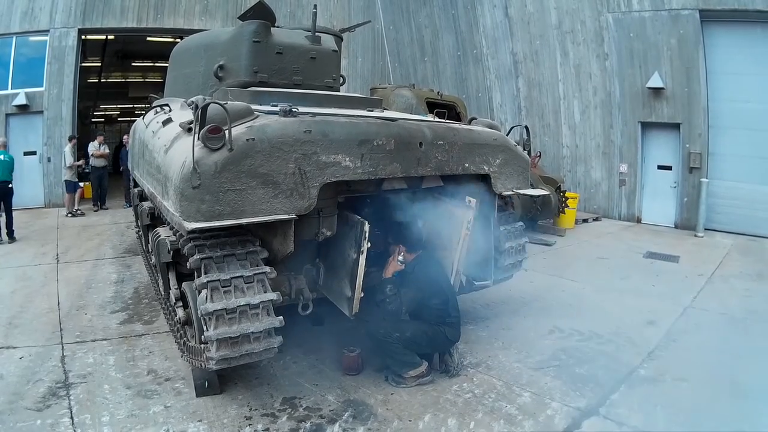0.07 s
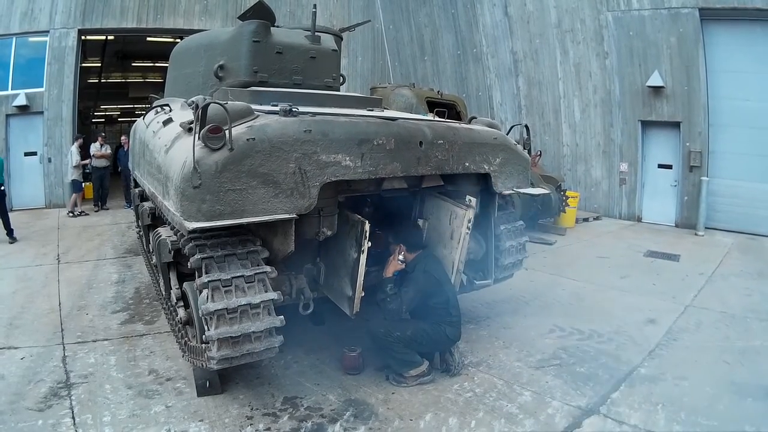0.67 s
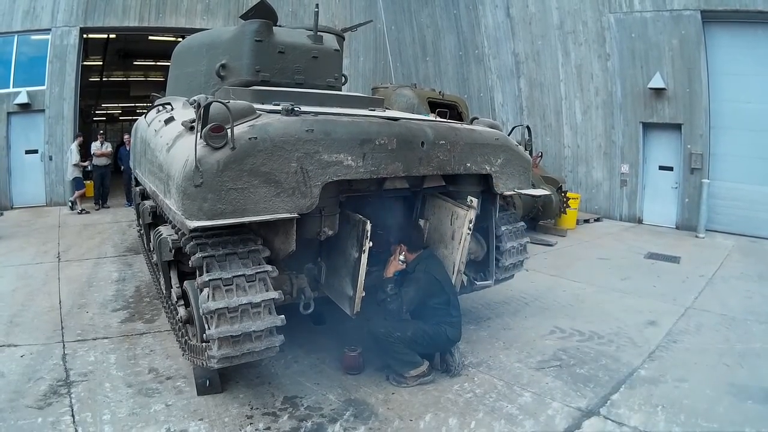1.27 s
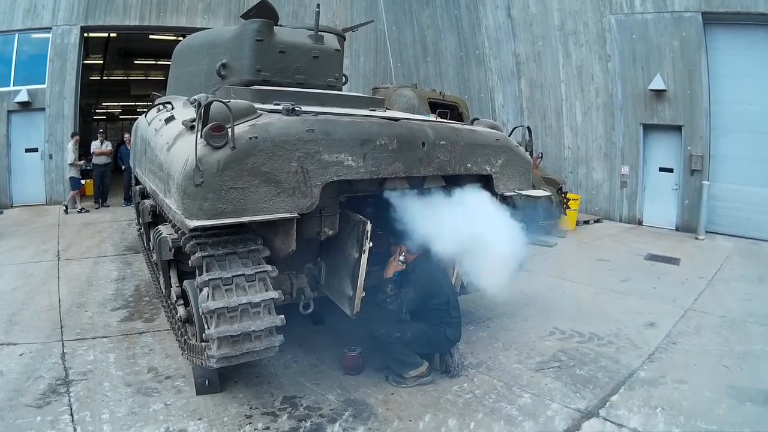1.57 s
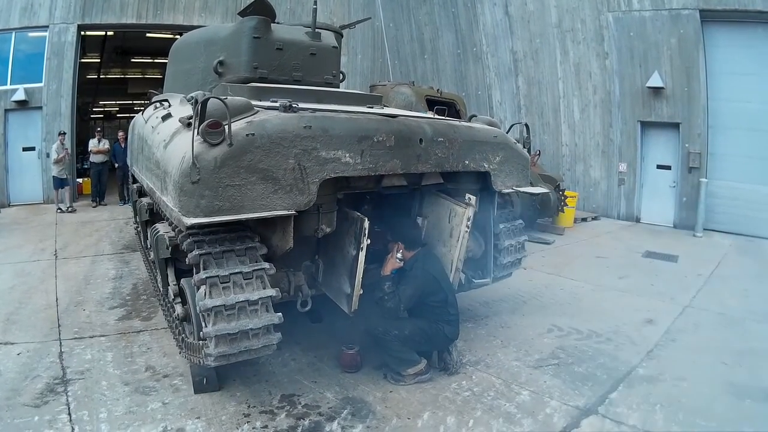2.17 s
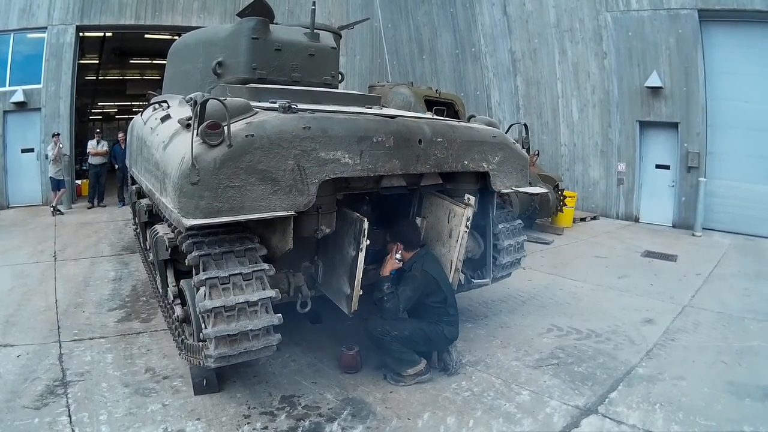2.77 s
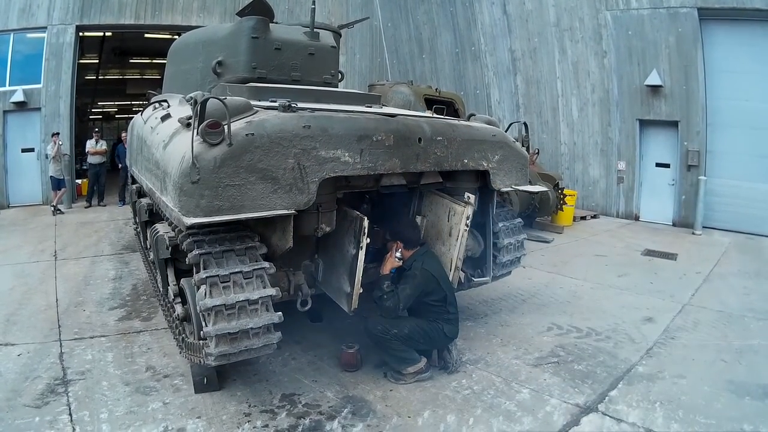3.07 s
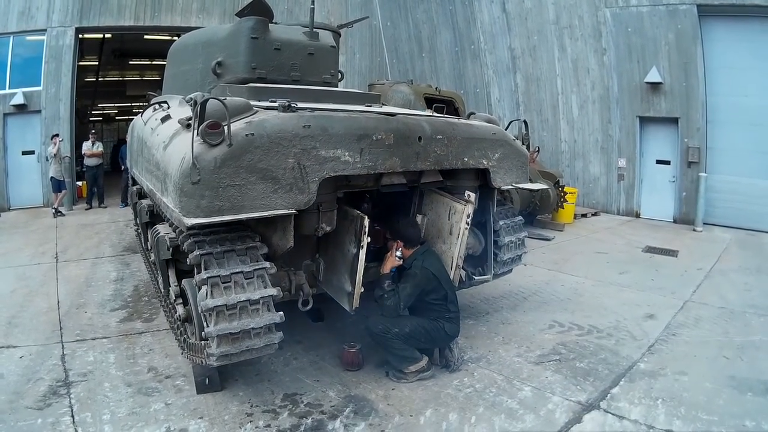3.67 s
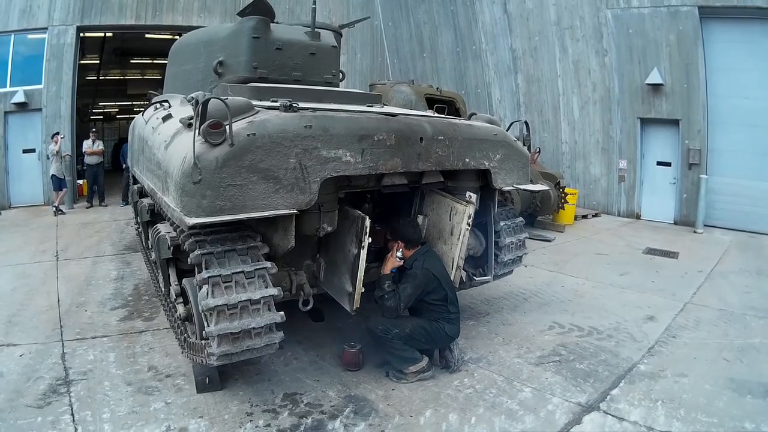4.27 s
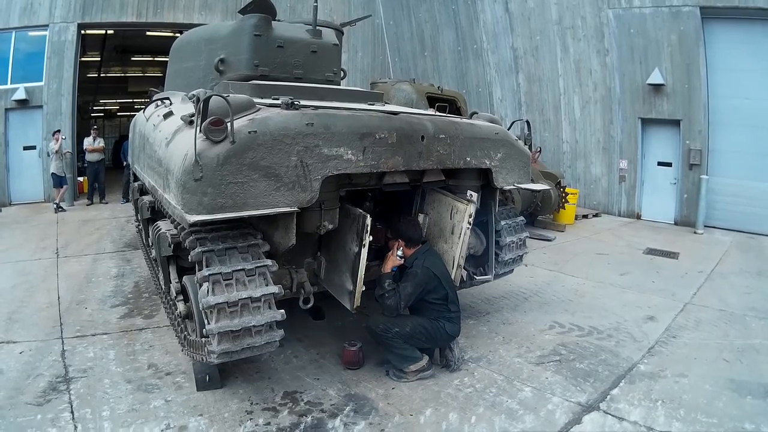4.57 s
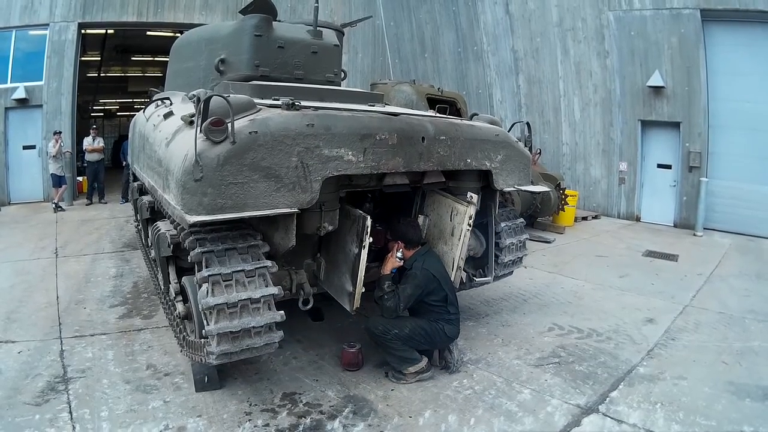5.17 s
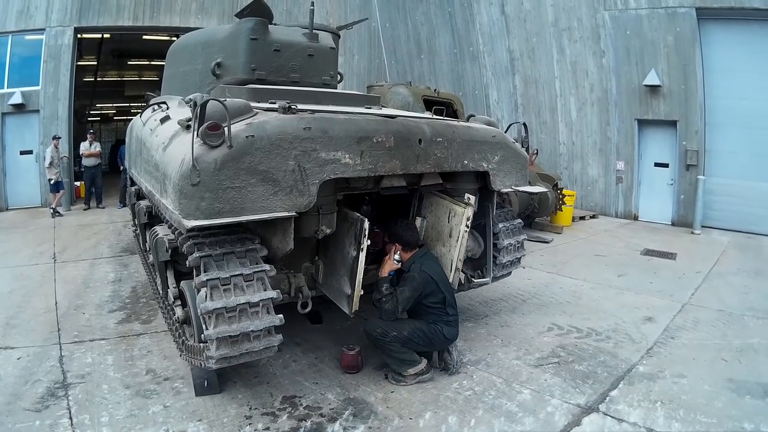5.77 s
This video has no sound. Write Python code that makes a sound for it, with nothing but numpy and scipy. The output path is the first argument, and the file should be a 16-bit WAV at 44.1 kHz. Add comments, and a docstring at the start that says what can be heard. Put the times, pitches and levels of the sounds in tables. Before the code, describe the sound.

A tearing bang opens the cold start of a big tank engine, followed by scattered pops and rough chugging. After a second bang the firing stops for a moment, then returns with hissing cracks and low thumps that quicken and smooth into a clattering idle over a soft fan hum. The microphone is close to the rear of the tank, outdoors, with brief reflections off concrete.

```python
"""Cold start of a radial tank engine.

Nine cylinders start in a concrete yard, heard from behind the open engine doors. The engine stumbles
on single firings, backfires twice and cuts out, then catches, gathers speed and settles to an idle.
Each firing is a pressure pulse that rings the exhaust pipe; cold cylinders miss, so every cycle chugs.
Valve impacts clatter in the resonant steel bay, and the cooling fan hums at its blade-passing tones."""
import sys
import numpy as np
from scipy import signal
from scipy.fft import rfft, irfft, next_fast_len
from scipy.io import wavfile

SR = 44100
rng = np.random.default_rng(int(sys.argv[2]) if len(sys.argv) > 2 else 0)


def digitize_waveform(pressure):
    """Quantize a signal to 16-bit integers and store it at the path in sys.argv[1].

    Rows of a 2-D input are taken as channels; values are limited to [-1, 1].
    """
    field = np.atleast_2d(pressure).T
    bounded = np.clip(field, -1, 1)
    quanta = np.round(bounded * 32767).astype(np.int16)
    wavfile.write(sys.argv[1], SR, quanta)


N = 265923
TIME = np.arange(N) / SR


def from_db(db):
    """Amplitude ratio of a level in decibels."""
    return 10 ** (np.asarray(db) / 20)


def curve(rows, at=TIME, column=1):
    """Linear interpolation of one column of a table over time."""
    rows = np.array(rows)
    return np.interp(at, rows[:, 0], rows[:, column])


def unit_rms(x):
    """Normalisation to unit mean power."""
    return x / np.sqrt(np.mean(x ** 2) + 1e-20)


def drift(rate):
    """Random modulation of unit power, changing about rate times a second."""
    return unit_rms(np.interp(TIME * rate, np.arange(20000), rng.standard_normal(20000)))


def colour(x, spectrum):
    """Minimum-phase filtering to a spectral shape; white noise keeps its power."""
    size = 2 * next_fast_len(N // 2 + 8192)
    hz, db = np.transpose(spectrum)
    bin_hz = np.arange(size // 2 + 1) * SR / size
    gain = unit_rms(from_db(np.interp(np.log(bin_hz + 1), np.log(hz), db)))
    cepstrum = irfft(np.log(gain))
    cepstrum[1:size // 2] *= 2   # folding the cepstrum makes the filter causal
    cepstrum[size // 2 + 1:] = 0
    return irfft(rfft(x, size) * np.exp(rfft(cepstrum)))[:N]


def resonate(x, modes):
    """Modal superposition: damped resonators respond in parallel."""
    out = np.zeros(N)
    for hz, width, db in modes:
        radius = np.exp(-np.pi * width / SR)
        feedforward = np.array([1, 0, -1]) * (1 - radius ** 2) / 2
        feedback = [1, -2 * radius * np.cos(2 * np.pi * hz / SR), radius ** 2]
        out += from_db(db) * signal.lfilter(feedforward, feedback, x + 1e-18)
    return out


def impulses(times, db):
    """An impulse train with the given times and levels."""
    at = np.round(times * SR).astype(int)
    heard = (at >= 0) & (at < N)
    return np.bincount(at[heard], from_db(db)[heard], N)


def bursts(times, db, rise_s, decay_s):
    """Incoherent noise bursts add in power; each swells and decays exponentially."""
    power = impulses(times, db) ** 2 + 1e-18
    fall, swell = np.exp(-2 / (decay_s * SR)), np.exp(-1 / (rise_s * SR))
    power = signal.lfilter([1], [1, -fall], power)
    power = signal.lfilter([1 - swell], [1, -swell], power)
    return np.sqrt(power) * rng.standard_normal(N)


# Each row: time in seconds, engine speed in four-stroke cycles per second.
ENGINE_SPEED = [(0.0, 4.8), (0.55, 5.5), (1.0, 6.28), (1.55, 6.16), (1.7, 6.68), (2.3, 8.45), (2.8, 10.22),
                (3.8, 12.13), (4.1, 12.6), (4.9, 11.47), (6.03, 10.36)]

def crank(catch_s):
    """Phase is the integral of speed: returns speed, and cycles counted from the catch."""
    speed = curve(ENGINE_SPEED)
    cycles = np.cumsum(speed) / SR
    return speed, cycles - np.interp(catch_s, TIME, cycles)


def crank_times(cycles, per_cycle):
    """Phase locking: the times and indices of evenly spaced crank angles."""
    step = np.arange(int(np.ceil(cycles[0] * per_cycle)), int(cycles[-1] * per_cycle) + 1)
    return np.interp(step / per_cycle, cycles, TIME), step


def warmth(at=TIME, start_s=2.37, span_s=1):
    """Warming evens out combustion: a ramp from 0 (cold) to 1 (warm)."""
    return np.clip((at - start_s) / span_s, 0, 1)


# Cylinders in firing order. Each row: cold strength, warm strength, extra hiss, thump, all in dB.
CYLINDER_OFFSETS = [(-10, 1.5, -2.5, -3), (-14, -2.5, 0, -18), (5, 3, 1.5, 0), (5.5, 1.5, 3, 6.5),
                    (10, 3.5, 0, 6.5), (6.5, 3, 3.5, 6.5), (4.5, 1, 3.5, -12), (-34, 0, -11, -23),
                    (-6.5, -4.5, 1, -6)]
# Spans in which ignition takes. Each row: start and end in seconds.
IGNITION_SPANS = [(.54, 1.065), (1.565, 6.1)]
# Each row: time in seconds, base puff level in dB, base hiss level in dB.
THROTTLE_LEVELS = [(.9, -43, -51), (1.69, -42, -49.5), (2.5, -39, -48), (3.7, -34, -47),
                   (4.2, -37.5, -50.5), (4.6, -39.5, -54), (6.03, -41, -52)]
# Lone firings before the engine catches, and one last spit of the first cylinder at idle.
# Each row: time in seconds, then jolt, puff and hiss levels in dB.
LONE_FIRINGS = [(.0004, -29, -39, -35.5), (0.2295, -47, -37, -39.5), (.3967, -33, -41, -46),
                (.4632, -45, -66, -41.5), (0.4835, -24.5, -39, -45), (5.925, -24.5, -36, -40)]
# The first cylinder spits in every cycle, then in every other one.
SPIT_ALWAYS_UNTIL_S, SPIT_ALTERNATE_UNTIL_S = 3.2, 4.05

def firings(cycles, uneven_db=1.0, spit_db=3):
    """Unequal combustion modulates each cycle: returns firing times and levels, and spit times."""
    times, step = crank_times(cycles, len(CYLINDER_OFFSETS))
    cycle, cylinder = np.divmod(step, len(CYLINDER_OFFSETS))
    lit = np.any([(times > start) & (times < end) for start, end in IGNITION_SPANS], axis=0)
    spit_until = np.where(cycle % 2, SPIT_ALTERNATE_UNTIL_S, SPIT_ALWAYS_UNTIL_S)
    spitting = (cylinder == 0) & (times < spit_until)
    cold, warm, extra_hiss, extra_thump = np.array(CYLINDER_OFFSETS)[cylinder].T
    scatter = uneven_db * rng.standard_normal(len(times))
    strength = np.where(spitting, spit_db, cold + (warm - cold) * warmth(times)) + scatter
    jolt_db = curve(CLATTER_LEVELS, times) + .7 * strength
    puff_db = curve(THROTTLE_LEVELS, times) + strength
    hiss_db = curve(THROTTLE_LEVELS, times, column=2) + 1.22 * strength + extra_hiss
    thump_db = curve(THROTTLE_LEVELS, times) + np.where(spitting, spit_db, extra_thump) + scatter
    regular = np.c_[times, jolt_db, puff_db, hiss_db, thump_db][lit]
    lone = [(start, jolt, puff, hiss, puff) for start, jolt, puff, hiss in LONE_FIRINGS]
    return np.vstack([lone, regular]).T, times[lit & spitting]


# The hollow under the hull. Each row: frequency in Hz, bandwidth in Hz, peak gain in dB.
CAVITY_MODES = [(87, 170, -2.5)]

def thumps(times, db, speed, settling_s=.4):
    """Volume displacement: each slug of gas is one pressure swing that drives a cavity resonance."""
    slugs = np.zeros(N)
    lag, width = 0.56, 0.32   # in firing intervals, so the swing shortens with speed
    for start, gain in zip(times, from_db(db)):
        near = slice(*np.searchsorted(TIME, [start - .02, start + .06]))
        phase = (TIME[near] - start) * speed[near] * len(CYLINDER_OFFSETS) - lag
        slugs[near] += gain * np.sin(2 * np.pi * 0.9 * phase) * np.exp(-(phase / width) ** 2 / 2)
    settled = np.clip((TIME - SPIT_ALTERNATE_UNTIL_S) / settling_s, 0, 1)
    direct_db = -4.0 - 3.7 * warmth() - 3.9 * settled   # softer as it warms and regular spitting ends
    return from_db(direct_db) * slugs + from_db(-6.5) * resonate(slugs, CAVITY_MODES)


# The exhaust pipe. Each row: frequency in Hz, bandwidth in Hz, peak gain in dB.
PIPE_MODES = [(111, 20, -9.5), (189.5, 27, -6.5), (304.5, 25.5, 1), (357, 97, -28), (464, 110, -17),
              (544, 74, -7.5), (765, 83, -9)]
# Spectra of the escaping gas. Each row: frequency in Hz, relative density in dB.
PUFF_SPECTRUM = [(30, -48), (80, -7), (140, -5.5), (200, 1), (330, -2.5), (480, 2.5), (660, -10),
                 (790, 2.5), (900, -8.5), (1200, 3), (1450, 2), (1900, -4.5), (3900, -28.5), (4900, -23),
                 (9000, -49)]
HISS_SPECTRUM = [(1000, 8.5), (2000, 1), (3900, 10.5), (4900, -3.5), (5600, 10.5), (6100, 1.5), (6450, -12),
                 (6900, 2.5), (9800, -5), (11000, 2.5), (11800, -6), (13000, -20), (16000, -22)]

def exhaust(times, puff_db, hiss_db, front_hz=900):
    """A rounded gas front excites the pipe's standing waves; turbulence adds a puff and a hiss."""
    rounding = signal.butter(2, front_hz, fs=SR, output="sos")
    fronts = signal.sosfilt(rounding, impulses(times + 0.00198, puff_db) + 1e-18)
    pipe = from_db(40.5) * resonate(fronts, PIPE_MODES)
    puff = from_db(2.0) * bursts(times, puff_db, rise_s=.004, decay_s=.011)
    hiss = from_db(1.5) * bursts(times, hiss_db, rise_s=0.0021, decay_s=0.01)
    return pipe + colour(puff, PUFF_SPECTRUM) + colour(hiss, HISS_SPECTRUM)


# Each row: time in seconds, base level of the valve gear in dB.
CLATTER_LEVELS = [(0, -27.5), (.52, -34.5), (1.0, -29), (1.38, -35.5), (1.46, -43.5), (1.56, -43),
                  (1.63, -30.5), (2.8, -29), (6.03, -32)]
# Spectrum of the valve gear. Each row: frequency in Hz, relative density in dB.
GEAR_SPECTRUM = [(100, -47), (300, -8), (680, -31.5), (1000, -10), (1180, -10), (1380, 0.5), (1530, -0.5),
                 (1680, -6.5), (1900, -12), (3000, -20.5), (3950, -19), (4800, -34), (7000, -44.5),
                 (15000, -87)]

def valve_gear(cycles, fired, jolt_db, uneven_db=1.2, inlet_db=4.0, whirr_db=-2.0):
    """Impact noise: exhaust and inlet valves knock in turn over the whirr of the gears."""
    times, step = crank_times(cycles, 2 * len(CYLINDER_OFFSETS))
    knock_db = inlet_db * (step % 2) + uneven_db * rng.standard_normal(len(times))
    knocks = unit_rms(bursts(times + 0.00325, knock_db, rise_s=0.00016, decay_s=0.0033))
    whirr = from_db(whirr_db) * rng.standard_normal(N)
    clatter = from_db(curve(CLATTER_LEVELS) - 6.5) * unit_rms(knocks + whirr)
    jolts = bursts(fired + 0.0044, jolt_db, rise_s=0.0023, decay_s=0.0052)   # firings take up the slack
    return colour(clatter + jolts, GEAR_SPECTRUM)


# Each entry: a fan tone's frequency in periods per engine cycle.
BLADE_ORDERS = [32, 64]
# Each entry: that tone's relative level in dB.
BLADE_LEVELS = [4.5, -14.5]

def fan(cycles, speed, idle_speed=10.7, db_per_octave=25, flutter_db=3.0, surge_cycles=.004):
    """Blade-passing tones follow the crank, surging with each chug and growing louder up to idle."""
    angle = 2 * np.pi * (cycles + surge_cycles * np.sin(2 * np.pi * cycles))
    tones = sum(from_db(db + flutter_db * drift(45)) * np.sin(order * angle)
                for order, db in zip(BLADE_ORDERS, BLADE_LEVELS))
    level_db = -48 + db_per_octave * np.minimum(np.log2(speed / idle_speed), 0)
    return from_db(level_db - drift(7.1)) * unit_rms(tones)   # wavers by about 1 dB


# Spectrum of the background. Each row: frequency in Hz, relative density in dB.
AIR_SPECTRUM = [(20, -13), (42, 10.5), (120, -5), (300, -12), (700, -6.5), (1400, 2.5), (4000, -47),
                (6500, -31.5), (16000, -36)]

def air():
    """Stationary broadband noise forms a faint ambient floor."""
    return from_db(-47.5) * colour(rng.standard_normal(N), AIR_SPECTRUM)


# Each row: start in seconds, blast level in dB, swell, hold and decay in seconds, boom level in dB.
BACKFIRE_BLASTS = [(0.038, -15.5, 0.011, 0.02, 0.021, -46), (1.073, -16.5, 0.0064, 0.023, 0.016, -23.5),
                   (1.114, -35, 0.0034, 0.014, 0.025, -32.5)]
# Spectra of a backfire. Each row: frequency in Hz, relative density in dB.
BLAST_SPECTRUM = [(200, -45), (1100, -16), (1450, 2), (1750, 1.5), (1950, -7), (2300, -3.5), (3000, -5.5),
                  (3900, -5.5), (4900, -16.5), (5600, -11), (6400, -28.5), (7200, -24), (11200, -24),
                  (15000, -56)]
BOOM_SPECTRUM = [(30, -8), (90, -8), (150, 8), (240, 6), (380, 4), (520, -9), (740, 9), (860, 4),
                 (1050, 7.5), (1500, 4), (3000, -48)]

def backfires(crackle_db=1.0, jet_db=-17.5):
    """Sudden gas expansion: unburnt fuel goes off in the pipe as a tearing blast over a boom."""
    blast, jet, boom = np.zeros((3, N))
    for start, db, swell, hold, decay, boom_db in BACKFIRE_BLASTS:
        age = TIME - start
        envelope = np.clip(age / swell, 0, 1) ** 2 * np.exp(-np.maximum(age - swell - hold, 0) / decay)
        blast += from_db(db) * envelope
        jet += from_db(db + jet_db) * envelope ** 3   # the gas hisses only near full pressure
        boom += from_db(boom_db) * envelope
    tearing = unit_rms(from_db(crackle_db * drift(900)))
    white = rng.standard_normal((3, N))
    return (colour(blast * tearing * white[0], BLAST_SPECTRUM)
            + colour(jet * tearing * white[1], HISS_SPECTRUM)
            + colour(boom * white[2], BOOM_SPECTRUM))


# Hard firings, and one faint mechanical clank while the engine has cut out.
# Each row: time in seconds, level in dB.
SHARP_KNOCKS = [(.405, -37), (.468, -37), (.491, -37.5), (.639, -29), (.971, -36), (1.399, -60),
                (1.616, -34), (1.908, -29.5), (2.381, -34), (3.748, -22.5)]
# Spectrum of a crack. Each row: frequency in Hz, relative density in dB.
CRACK_SPECTRUM = [(300, -22), (1100, 1), (1450, 15), (1950, 3), (3100, -2), (3900, 5.5), (4900, -17),
                  (5600, -34), (6400, -16.5), (11000, -16), (14000, -41)]

def cracks(spits, crack_lag_s=.006):
    """Pressure transients: a charge vented still burning hisses and cracks; sharp knocks only crack."""
    cold_boost_db = 0.5 * (1 - warmth(spits))
    spit_cracks = np.c_[spits + crack_lag_s, -30 + cold_boost_db]
    times, crack_db = np.vstack([SHARP_KNOCKS, spit_cracks]).T
    hiss = bursts(spits, -34.5 + cold_boost_db, rise_s=0.0018, decay_s=0.01)
    crack = bursts(times, crack_db, rise_s=0.0015, decay_s=0.012)
    return colour(crack, CRACK_SPECTRUM) + colour(hiss, HISS_SPECTRUM)


# The steel bay. Each row: frequency in Hz, bandwidth in Hz, peak gain in dB.
BAY_MODES = [(1399.5, 77, -3.5), (1457, 78, -4.5), (1710, 6.8, -35), (2062, 108, 2.5), (2500, 24, -3),
             (2606, 110, -3.5), (2500, 12, -8), (2820, 28, -14), (2940, 46, 4), (3045, 63, 3),
             (2950, 33, -2), (3555, 30, 3.5), (3730, 100, -10), (3744, 45, -5)]
# Echoes off the ground, doors and hull. Each row: delay in seconds, gain in dB.
REFLECTIONS = [(.0013, -27), (.0031, -27), (.0047, -23), (.0083, -27.5)]

def engine_bay(x):
    """Resonance and interference: the bay rings, and early reflections comb-filter the sound."""
    ringing = x + from_db(-2.5) * resonate(x, BAY_MODES)
    echoes = sum(from_db(db) * np.interp(TIME - delay, TIME, ringing, left=0)
                 for delay, db in REFLECTIONS)
    return from_db(-1.5) * (ringing + echoes)


def yard(x, t60_s=0.53, wet_db=-13.5, dull_hz=7260, onset_s=0.002):
    """Reverberation: concrete walls and an open hall return a dull, exponentially decaying tail."""
    age = TIME[:int(1.5 * SR)]
    build_up = 1 - np.exp(-(age / onset_s) ** 2)
    tail = rng.standard_normal(len(age)) * from_db(-60 * age / t60_s) * build_up
    tail /= np.sqrt(np.sum(tail ** 2))
    tail = signal.sosfilt(signal.butter(1, dull_hz, fs=SR, output="sos"), tail)
    return x + from_db(wet_db) * signal.fftconvolve(x, tail)[:N]


def scene():
    """Superposition: the engine rings its bay, joins the fan and spreads into the yard."""
    speed, cycles = crank(catch_s=1.694)
    (times, jolt_db, puff_db, hiss_db, thump_db), spits = firings(cycles)
    engine = thumps(times, thump_db, speed) + exhaust(times, puff_db, hiss_db)
    engine += cracks(spits) + backfires() + valve_gear(cycles, times, jolt_db)
    radiated = engine_bay(engine) + fan(cycles, speed)
    return (yard(radiated) + air())[None]


def record(dry, low_hz=31, high_hz=15800):
    """Band limiting: the microphone sheds the deepest rumble, and the top is cut steeply."""
    thinned = signal.sosfilt(signal.butter(4, low_hz, "high", fs=SR, output="sos"), dry)
    return signal.sosfilt(signal.ellip(10, .2, 90, high_hz, fs=SR, output="sos"), thinned)


dry = scene()
out = record(dry)
digitize_waveform(out)
```